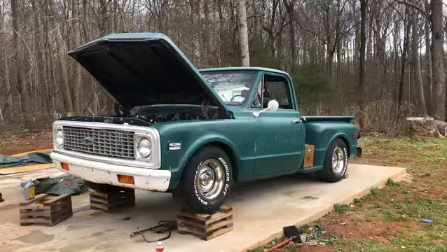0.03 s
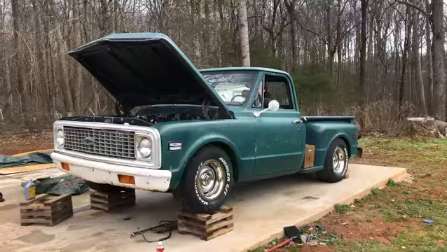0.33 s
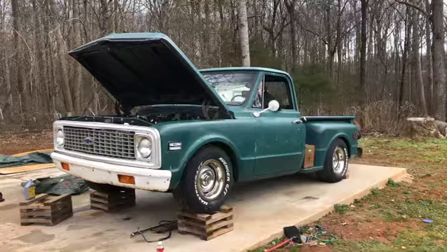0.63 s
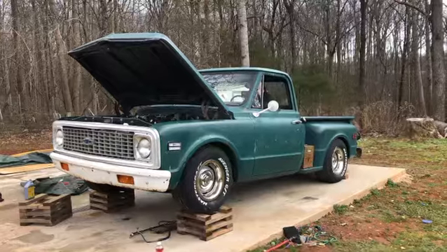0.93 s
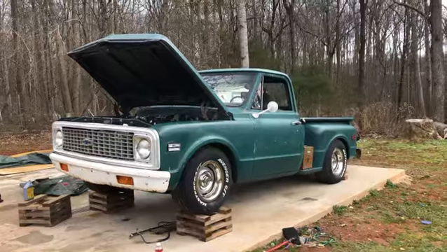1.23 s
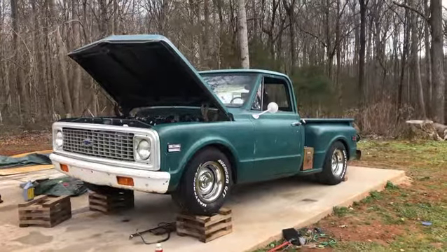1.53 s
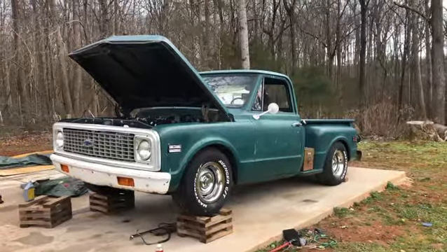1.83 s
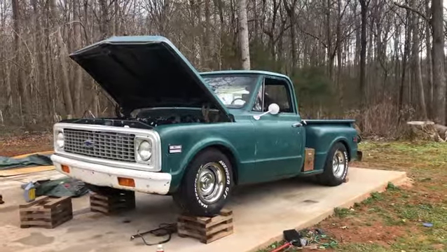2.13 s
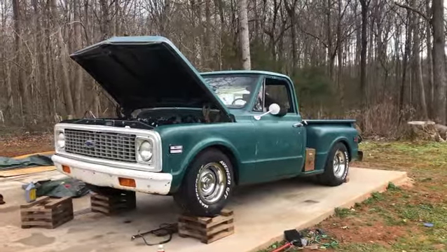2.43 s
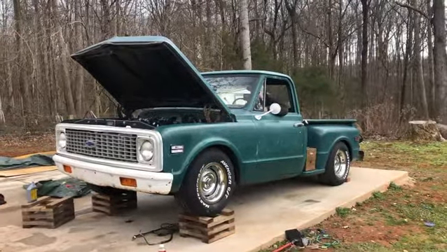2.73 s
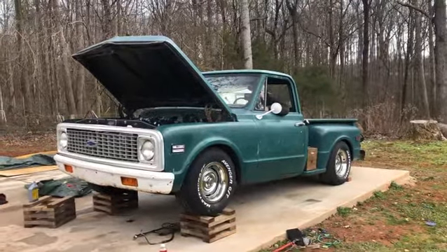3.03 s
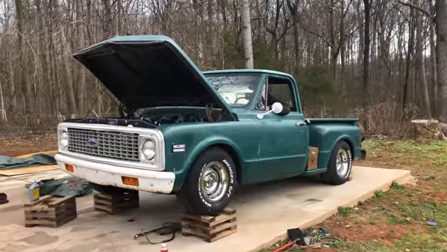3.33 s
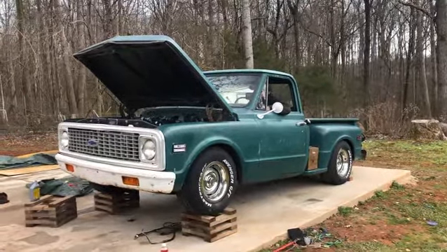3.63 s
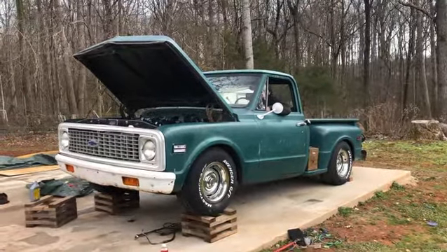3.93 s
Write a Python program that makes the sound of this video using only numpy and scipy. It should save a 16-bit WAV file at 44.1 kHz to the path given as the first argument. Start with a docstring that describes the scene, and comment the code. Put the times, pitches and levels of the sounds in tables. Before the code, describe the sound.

An old truck engine fires up in the open air, heard from a few metres. A quiet low drone comes first, then a short whining crank, grinding gears and barking exhaust as the revs rise and fall to a pulsing idle.

```python
"""An old V8 pickup engine is started outdoors with its bonnet open, a few metres away.
Over a low drone and a few soft thumps the starter clacks in and cranks, whining at its tooth rate.
The engine catches while the pinion still grinds on the ring gear, flares up, then sinks to a lumpy idle.
Its firings are a pulse train that drives the resonances of the exhaust pipe; single hard ones bark."""
import sys
import numpy as np
from scipy import signal
from scipy.fft import rfft, irfft, next_fast_len
from scipy.io import wavfile
from scipy.ndimage import uniform_filter1d, map_coordinates

SR = 44100
rng = np.random.default_rng(int(sys.argv[2]) if len(sys.argv) > 2 else 0)


def bounce(signal):
    """Save signal as a 16-bit WAV file at the path given by the first command-line argument."""
    frames = np.transpose(np.atleast_2d(signal))
    limited = np.clip(frames, -1, 1)
    pcm = np.round(limited * 32767).astype(np.int16)
    wavfile.write(sys.argv[1], SR, pcm)


N = 176400
T = np.arange(N) / SR

# engine speed: time_s, firing_rate_hz
ENGINE_SPEED = [(2.72, 49.6), (2.8, 60.7), (2.9, 88.2), (3.05, 91.5), (3.28, 102.5), (3.42, 92.4),
                (3.55, 66), (3.7, 58.6), (4, 57)]


def amp(db):
    """Decibels to amplitude ratio."""
    return 10 ** (np.asarray(db) / 20)


def unit(x):
    """Normalisation to rms 1."""
    return x / np.sqrt(np.mean(x ** 2) + 1e-20)


def curves(rows):
    """Linear interpolation of each column after the time, one value per sample."""
    times, *columns = np.transpose(rows)
    return [np.interp(T, times, column) for column in columns]


def wobble(rate):
    """Smooth random modulation, with rate knots a second."""
    return map_coordinates(rng.standard_normal(4096), [T * rate], mode="wrap")


def noise():
    """White Gaussian noise."""
    return rng.standard_normal(N)


def tone(hz):
    """A sinusoid at rms 1 whose phase is the integral of its frequency."""
    return unit(np.sin(2 * np.pi * np.cumsum(hz) / SR))


def rough_tone(hz, width_hz):
    """Random frequency modulation spreads a tone into a narrow band."""
    return tone(hz + width_hz / 2 * wobble(2 * width_hz))


def filtered(x, response):
    """Linear filtering: the spectrum of x times a frequency response."""
    size = next_fast_len(N + SR // 2)
    return irfft(rfft(x, size) * response(np.fft.rfftfreq(size, 1 / SR)), size)[:N]


def coloured(x, points):
    """Spectral shaping by points of (frequency_hz, gain_db), at rms 1."""
    hz, db = np.transpose(points)
    return unit(filtered(x, lambda f: amp(np.interp(np.log(f + 1), np.log(hz + 1), db))))


def resonate(x, modes):
    """Superposed modes of (pitch_hz, width_hz, gain_db), alternating in sign, at rms 1."""
    def response(f):
        return sum((-1) ** k * amp(db) * 1j * f * width / (hz * hz - f * f + 1j * f * width)
                   for k, (hz, width, db) in enumerate(modes))
    return unit(filtered(x, response))


def burst(start, t60, attack_s):
    """A quick rise and an exponential decay of 60 dB in t60 seconds."""
    age = np.maximum(T - start, 0)
    return (1 - np.exp(-age / attack_s)) * np.exp(-np.log(1000) * age / t60)


def swell(centre, half):
    """A Gaussian envelope about a moment."""
    return np.exp(-((T - centre) / half) ** 2)


def pulses(rate, jitter_s, scatter_db, pattern_db=(0,)):
    """A quasi-periodic impulse train: one per cycle of a moving rate, uneven in time and size."""
    cycles = np.cumsum(rate) / SR
    k = np.arange(int(cycles[-1]) + 1)
    chance = rng.standard_normal((16384, 2))[k]
    times = np.interp(k + 1e-6, cycles, T) + jitter_s * chance[:, 0]
    sizes = amp(scatter_db * chance[:, 1] + np.take(pattern_db, k, mode="wrap"))
    return np.bincount(np.clip(times * SR, 0, N - 1).astype(int), sizes, N)


def drone():
    """A low tone wavers under random amplitude and frequency modulation."""
    # course of the drone: time_s, pitch_hz, level_db
    course = [(0.08, 163.6, -51), (0.24, 143.4, -76), (0.29, 157.1, -37), (0.44, 135.4, -36.5),
              (0.63, 167, -43.5), (1.13, 142.9, -39.5), (1.75, 149, -36), (1.82, 171.1, -35.5),
              (2.02, 132.3, -72), (2.13, 137.1, -35.5), (2.42, 142.2, -45.5), (2.5, 124, -70)]
    hz, db = curves(course)
    return amp(db - 0.5 + 0.87 * wobble(17.99)) * tone(hz + 3 * wobble(24.9))


def thin_whine():
    """Coupled modulation: three harmonics sag in pitch as they swell in level."""
    # swells of the whine: centre_s, half_length_s
    swells = [(0.514, 0.063), (0.932, 0.072), (1.169, 0.041), (1.571, 0.0463), (1.85, 0.087)]
    load = sum(swell(s, half) for s, half in swells)
    pitch_hz = 5080 - 44.7 * load + 8 * wobble(38.2)
    level_db = -76.5 + 5.5 * load + 2.7 * wobble(44.7)
    return amp(level_db) * sum(amp(-10 * k) * tone((k + 1) * pitch_hz) for k in range(3))


def background():
    """Broadband open-air noise, superposed with the drone, the thin whine and a faint whistle."""
    # spectrum of the open air: frequency_hz, gain_db
    air_spectrum = [(18, -57), (30, -23), (69, -11.5), (107, -14), (147, 1.5), (253, -15), (355, -14.5),
                    (448, -20.5), (881, -27.5), (1030, -33), (4540, -49), (15000, -66)]
    tones = drone() + thin_whine()
    whistle = amp(-62) * tone(871 + 1.93 * wobble(22.6))
    air = amp(-40) * coloured(noise(), air_spectrum)
    fade_in = np.clip((T - 0.069) / .002, 0, 1)
    return (tones + whistle + air) * fade_in


def soft_thumps():
    """The impulse response of a heavily damped body, once per push, with a little rustle."""
    # pushes on the body: start_s, level_db
    thumps = [(0.736, -30.5), (1.426, -25), (1.814, -28), (1.853, -25), (2.289, -24), (2.319, -18.5)]
    # modes of the body: pitch_hz, width_hz, gain_db
    body_modes = [(75.4, 37, 5), (178, 49, 8), (390, 320, 2.5)]
    pushes = np.bincount([round(s * SR) for s, _ in thumps], [amp(db) for _, db in thumps], N)
    body = filtered(resonate(pushes, body_modes), lambda hz: 1 / (1 + 1j * hz / 480) ** 4)  # low-pass
    rustle = coloured(noise(), [(30, -15), (90, -6), (430, 9), (750, -32), (8000, -70)])
    rustle *= sum(amp(db - 10) * burst(s, t60=.045, attack_s=0.0016) for s, db in thumps)
    return body * pushes.max() / np.abs(body).max() + rustle


def clacks():
    """The solenoid and pinion strike home; each impact is a decaying band of resonant noise."""
    # impacts: start_s, level_db, pitch_hz, width_hz, t60_s
    impacts = [(2.258, -26, 1747, 400, 0.051), (2.275, -25, 3220, 230, 0.13), (2.536, -23, 2004, 90, 0.097),
               (2.603, -23, 3100, 200, 0.084)]
    return sum(amp(db) * burst(s, t60, attack_s=0.001) * resonate(noise(), [(hz, width, 0)])
               for s, db, hz, width, t60 in impacts)


def scrapes():
    """Sliding friction: the starter's teeth slip briefly with a bright hiss."""
    # slips: centre_s, level_db, half_length_s
    slips = [(2.52, -23.5, .035), (2.677, -21.5, 0.03)]
    # friction spectrum: frequency_hz, gain_db
    spectrum = [(4000, -40), (8500, -2), (10500, 0), (13000, -13), (15500, -19)]
    return coloured(noise(), spectrum) * sum(amp(db) * swell(s, half) for s, db, half in slips)


def starter():
    """Gear-mesh excitation: the teeth rasp and whine, dropping in pitch as compression slows them."""
    # starter load: time_s, level_db
    load = [(2.265, -28.5), (2.361, -23.5), (2.391, -18.5), (2.485, -22.5), (2.547, -14), (2.597, -21.5),
            (2.607, -15), (2.7, -18)]
    # gear mesh: time_s, tooth_rate_hz
    mesh = [(2.26, 365), (2.33, 337), (2.4, 319), (2.46, 305), (2.485, 355), (2.515, 365), (2.56, 343),
            (2.61, 325), (2.69, 294)]
    # spectrum of the tooth impacts: frequency_hz, gain_db
    tooth_spectrum = [(200, -50), (340, -6.5), (700, -1.5), (1280, -6.5), (1600, -6.5), (2100, 3.5),
                      (7000, -7.5), (15000, -21)]
    # response of the housing: frequency_hz, gain_db
    housing = [(150, -9.5), (450, -11), (800, -4), (1300, 0), (1650, -6.5), (2200, -4.5), (3500, -2.5),
               (5200, -8), (9000, -4.5), (12500, -15), (15500, -38)]
    # strongest mesh harmonics: harmonic_number, gain_db
    harmonics = [(3, -6.5), (4, -1.5), (7, -4.5), (12, -5)]
    # their common envelope: time_s, level_db
    harmonic_level = [(2.3, -39.5), (2.41, -32), (2.46, -35.5), (2.67, -30.5)]
    engage_s, stop_s, release_s = 2.259, 2.7, 0.014
    load_db, = curves(load)
    mesh_hz, = curves(mesh)
    impacts = pulses(mesh_hz * (1 + .012 * wobble(90)), jitter_s=.00004, scatter_db=2.5)
    teeth = coloured(impacts, tooth_spectrum)
    casing_response = (noise() * burst(0, t60=0.081, attack_s=0.00032))[:SR // 20]
    whine = unit(signal.fftconvolve(teeth, casing_response)[:N]) + .5 * teeth
    whine *= amp(2.6 * wobble(21.87))
    rasp = coloured(noise() * amp(0.86 * wobble(500)), housing)
    overtones = amp(curves(harmonic_level)[0] + 2.5 * wobble(120))
    overtones *= sum(amp(db) * rough_tone(order * mesh_hz, width_hz=24) for order, db in harmonics)
    engaged = (T > engage_s) * np.exp(-np.maximum(T - stop_s, 0) / release_s)
    return engaged * (amp(load_db - 1) * unit(rasp + amp(-4) * whine) + overtones)


def pinion():
    """Forced vibration: the overrun pinion grinds and rings the ring gear, under a faint high shimmer."""
    # strength of the grinding: time_s, level_db
    grind = [(2.62, -60), (2.69, -13.5), (2.74, -12), (2.79, -14), (2.83, -12), (3.15, -14), (3.2, -39),
             (3.28, -31.5), (3.4, -70)]
    # spectrum of the grinding: frequency_hz, gain_db
    spectrum = [(650, -19), (1100, -12), (1350, -9), (1780, -12), (1920, -1), (2800, -2.5), (3560, 1),
                (4900, -2.5), (10500, -12.5), (13100, -15), (15500, -28)]
    # ring gear modes: pitch_hz, gain_db
    ring_modes = [(1906, -3.5), (1986, 6.5), (2290, -6), (2835, 7), (3205, -0.5), (3305, 4), (3456, 1.5),
                  (3612, 4), (4064, -5.5), (4247, 4), (4683, -1)]
    teeth_per_firing, ring_width_hz, shimmer_width_hz = 21, 24, 30
    grind_db, = curves(grind)
    firing_hz, = curves(ENGINE_SPEED)
    teeth = pulses(firing_hz * teeth_per_firing, jitter_s=.00015, scatter_db=5.5)
    blows = unit(teeth / np.sqrt(firing_hz)) + 0.93 * noise()
    ring = amp(-6.5) * resonate(blows, [(hz, ring_width_hz, db) for hz, db in ring_modes])
    scrape = amp(-1.5) * coloured(blows, spectrum)
    # a metallic shimmer: random narrow resonances from 5 to 11 kHz over the grinding
    shimmer_bands = [(hz, shimmer_width_hz, 0) for hz in rng.uniform(5000, 11000, size=24)]
    shimmer = amp(-14) * coloured(resonate(blows, shimmer_bands), spectrum)
    envelope = amp(grind_db + 1.3 * wobble(60)) * (T > grind[0][0])
    return envelope * (scrape + ring + shimmer)


def spits():
    """Air spits in the engine bay, and at 3.17 s a bark with a lower ring: transients of broadband hiss with a
    short metal resonance."""
    # spits, and one bark first: start_s, hiss_db, ring_db, ring_hz, width_hz, t60_s
    events = [(3.171, -45, -17.5, 1114, 209, 0.18), (3.241, -23, -27.5, 2730, 400, 0.077),
              (3.314, -25.5, -28, 2500, 400, 0.1), (3.576, -37.5, -34.5, 2580, 170, 0.15),
              (3.66, -33.5, -29.5, 2780, 500, 0.093), (3.822, -32.5, -33, 2120, 450, 0.13),
              (3.886, -34.5, -38, 2478, 500, 0.17), (3.981, -29, -28, 2500, 110, .07)]
    # spectrum of the hiss: frequency_hz, gain_db
    spectrum = [(800, -66), (2500, 5), (8000, 11), (12000, 8.5), (16000, -4)]
    hiss = coloured(noise(), spectrum)
    sound = np.zeros(N)
    for start, hiss_db, ring_db, hz, width, t60 in events:
        ring = amp(ring_db) * resonate(noise(), [(hz, width, 0)])
        sound += burst(start, t60, attack_s=0.0036) * (amp(hiss_db) * hiss + ring)
    return sound


def hard_firings():
    """Transient excitation: uneven burns make the exhaust resonances bark, boom and growl."""
    # hard firings: start_s, bark_db, boom_db, bark_t60_s
    firings = [(2.728, -21.5, -27, 0.27), (2.808, -22, -27, 0.18), (2.899, -19, -21, 0.097),
               (3.028, -15, -17, 0.055), (3.134, -20, -25.5, 0.37), (3.2, -32, -15, 0.096),
               (3.225, -17.5, -21, 0.12), (3.306, -15.5, -15, 0.075), (3.375, -16.5, -22, 0.12),
               (3.397, -15, -20, 0.066), (3.463, -25, -25, 0.13), (3.654, -25, -29, 0.26),
               (3.883, -26, -30, 0.14), (3.981, -25, -23.5, 0.1)]
    # spectrum of the bark: frequency_hz, gain_db
    bark_spectrum = [(150, -28), (250, -21), (377, -9), (540, -13.5), (699, -1), (1560, -19.5), (1730, -17),
                     (2750, -22), (4080, -27.5), (10100, -28.5), (15000, -35)]
    # ring of the bark: pitch_hz, width_hz, gain_db
    bark_modes = [(682, 43, 1), (782, 32, -4), (938, 30, -7)]
    # low body of a firing: pitch_hz, width_hz, gain_db
    boom_modes = [(175, 97, -2.5), (248, 35, 0), (345, 50, -3)]
    # throaty swell of the exhaust: centre_s, level_db, half_length_s, pitch_hz
    throat = [(3.33, -24, 0.029, 359.7)]
    boom_decay_ratio = 2.46
    rush = coloured(noise(), bark_spectrum)
    ring = resonate(coloured(noise(), [(300, -20), (650, -2.5), (1050, 3.5), (2000, -27)]), bark_modes)
    barks = amp(-1.5) * rush + amp(-5) * ring
    barks *= sum(amp(db) * burst(s, t60, attack_s=.002) for s, db, _, t60 in firings)
    booms = resonate(coloured(noise(), [(100, 9.0), (350, -3), (900, -11)]), boom_modes)
    booms *= sum(amp(db) * burst(s, boom_decay_ratio * t60, attack_s=0.0041)
                 for s, _, db, t60 in firings)
    growl = sum(amp(db) * swell(s, half) * rough_tone(hz, width_hz=38) for s, db, half, hz in throat)
    return 1.29 * barks + booms + growl


def engine():
    """Source and filter: firing pulses drive the pipe's modes and modulate gas noise and clatter."""
    # exhaust strength: time_s, level_db
    strength = [(2.74, -17.5), (2.82, -15.5), (2.87, -8.5), (2.98, -13), (3.055, -9), (3.14, -12.5),
                (3.215, -9), (3.245, -9), (3.285, -6.5), (3.335, -12), (3.405, -6), (3.52, -15),
                (3.62, -16), (3.675, -9), (3.735, -14), (3.79, -22.5), (3.904, -14.5), (3.964, -21),
                (4.0, -16)]
    # each cylinder in firing order: gain_db
    cylinders = [3.5, -4, 0, -6, 1.5, -3.5, 0.5, 2.5]
    # exhaust pipe resonances: pitch_hz, width_hz, gain_db
    pipe_modes = [(62.7, 8.2, 3), (88, 17.1, 0.5), (119.6, 26.4, -6.5), (151, 31.6, -5),
                  (182.5, 38.2, -6.5), (227.8, 26, -10.5), (343, 19, -24.5)]
    # spectrum of the outrushing gas: frequency_hz, gain_db
    gas_spectrum = [(60, -35), (120, 2.5), (220, 3.5), (300, -6), (500, -12), (680, -2.5), (800, -13),
                    (930, -2), (1150, -34), (3500, -57)]
    # spectrum of the valve gear and fan: frequency_hz, gain_db
    clatter_spectrum = [(590, -9), (1000, 2.5), (1100, -1), (2200, -2), (4050, -7), (9250, -10.5),
                        (15500, -22)]
    catch_s, puff_decay_s = 2.727, .007
    firing_hz, = curves(ENGINE_SPEED)
    strength_db, = curves(strength)
    running = T > catch_s
    firings = pulses(firing_hz * running, jitter_s=0.00114, scatter_db=2.5, pattern_db=cylinders)
    puff_shape = np.exp(-T[:SR // 10] / puff_decay_s)
    puffs = signal.fftconvolve(firings ** .6, puff_shape)[:N]  # more even in size than the firings
    puffs /= np.sqrt(np.mean(puffs[running] ** 2))
    pipe = resonate(unit(firings) + 0.046 * puffs * noise(), pipe_modes)
    pipe = signal.sosfilt(signal.butter(2, [40, 520], "band", fs=SR, output="sos"), pipe)
    # even out the level, so that the strength curve alone sets it
    pipe /= np.sqrt(np.abs(uniform_filter1d(pipe ** 2, SR // 20)) + .01)
    gas = puffs * coloured(noise(), gas_spectrum)
    clatter = (0.72 + 0.12 * puffs) * coloured(noise(), clatter_spectrum)
    mean_db = strength_db[running].mean()
    effort_db = strength_db - mean_db
    pipe *= amp(effort_db - 2.5)
    gas *= amp(0.85 * effort_db - 15.5)
    clatter *= amp(0.88 * effort_db - 21.5)
    return running * amp(mean_db) * (pipe + gas + clatter)


def scene():
    """The truck and its faint diffuse reflection from the trees, over the background and thumps."""
    truck = starter() + clacks() + scrapes() + pinion() + engine() + hard_firings() + 1.6 * spits()
    truck = filtered(truck, lambda hz: 1 - 1 / (1 + (hz / 30) ** 6))  # high-pass
    tail = (noise() * burst(0.03, t60=0.26, attack_s=.02))[:SR // 2]
    trees = signal.fftconvolve(truck, tail / np.linalg.norm(tail))[:N]
    return (truck + amp(-10) * trees + background() + soft_thumps())[None]


def record(dry):
    """Soft saturation rounds the peaks; a sharp low-pass limits the bandwidth."""
    ceiling, top_hz = .8, 15700
    rounded = dry[0] / (1 + np.abs(dry[0] / ceiling) ** 8) ** (1 / 8)
    return filtered(rounded, lambda hz: hz < top_hz)[None]


dry = scene()
out = record(dry)
bounce(out)
```